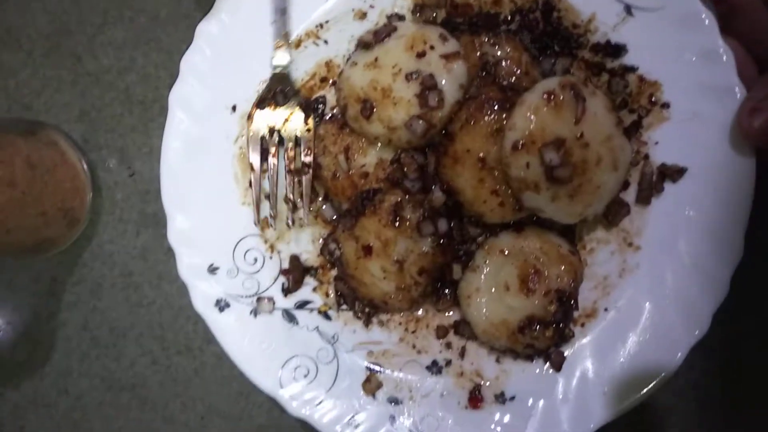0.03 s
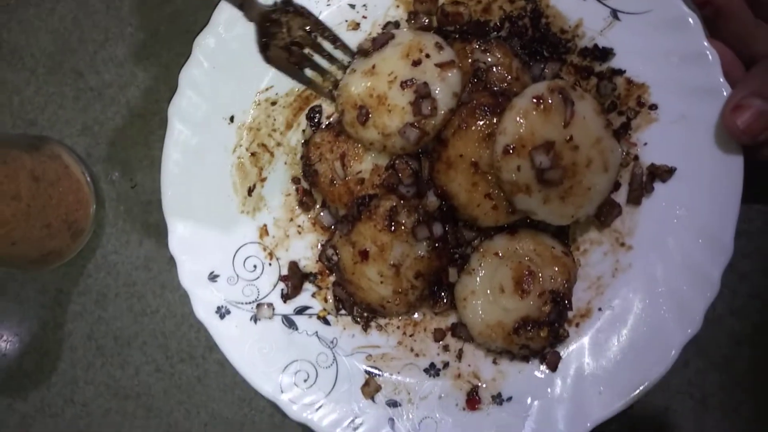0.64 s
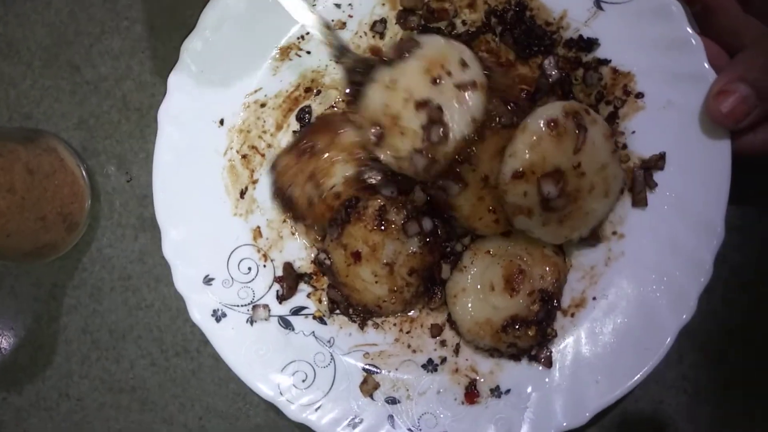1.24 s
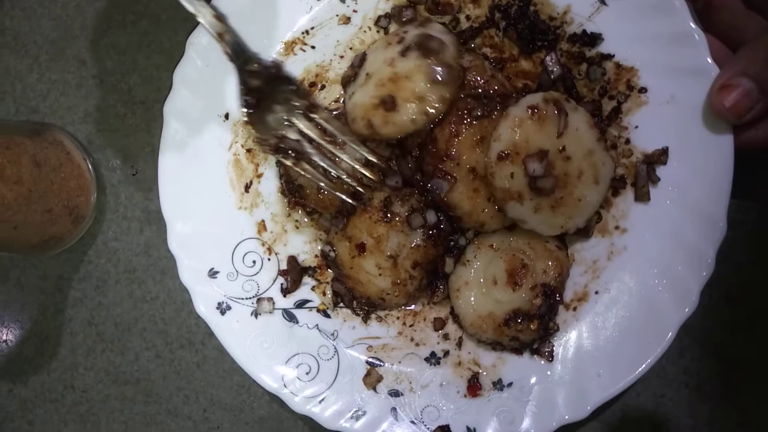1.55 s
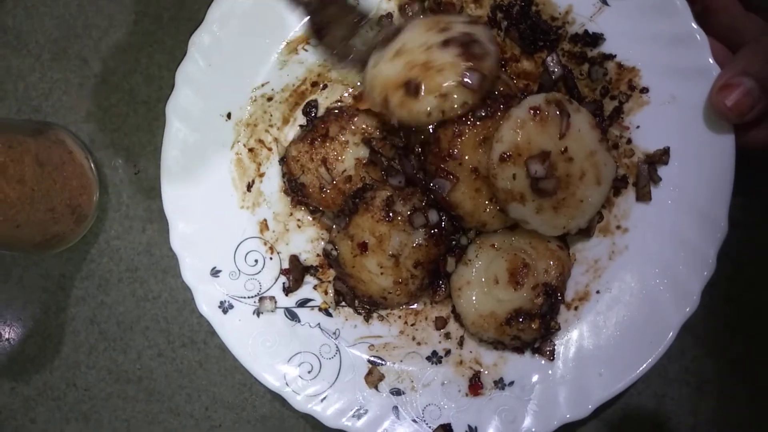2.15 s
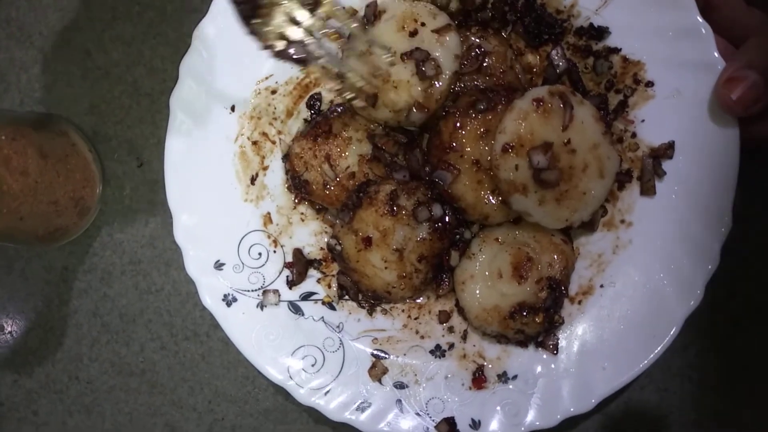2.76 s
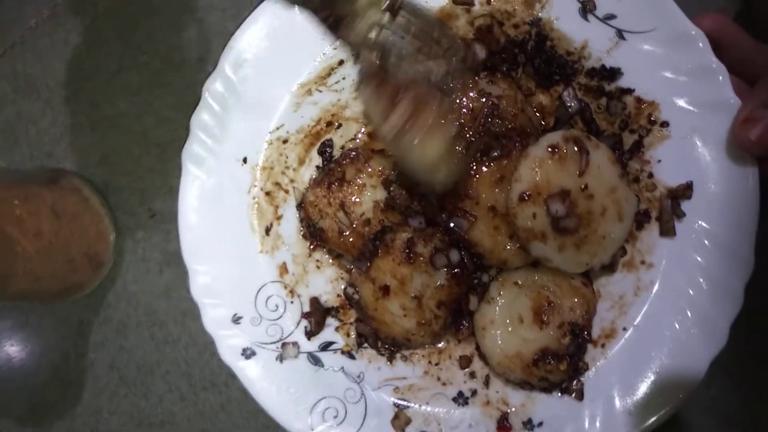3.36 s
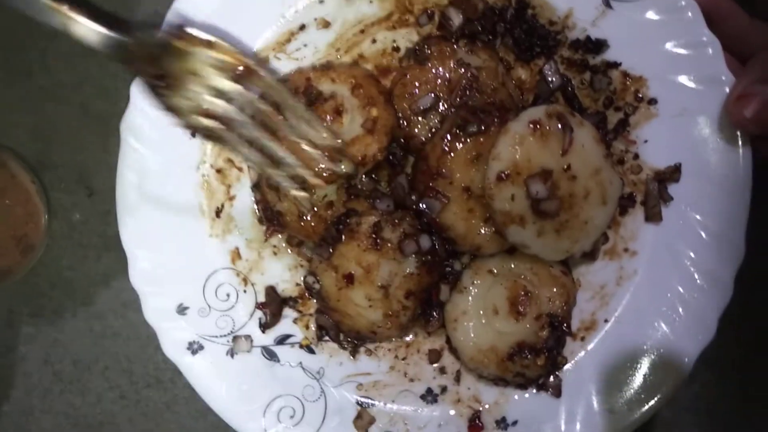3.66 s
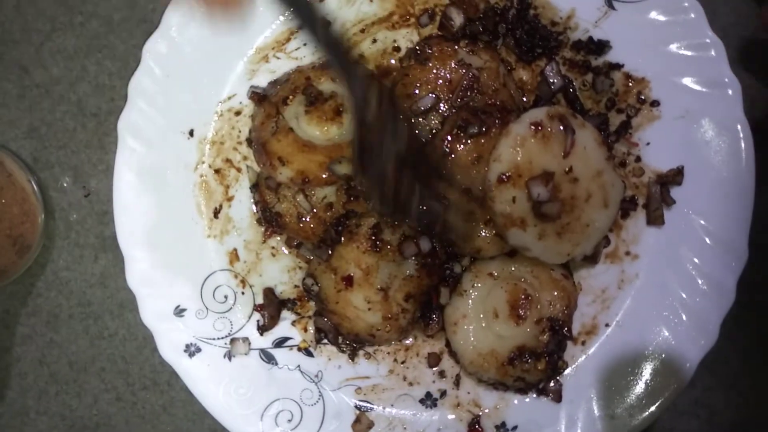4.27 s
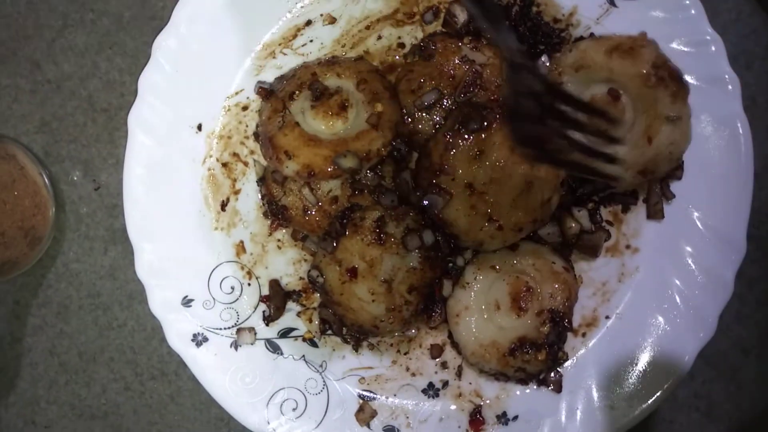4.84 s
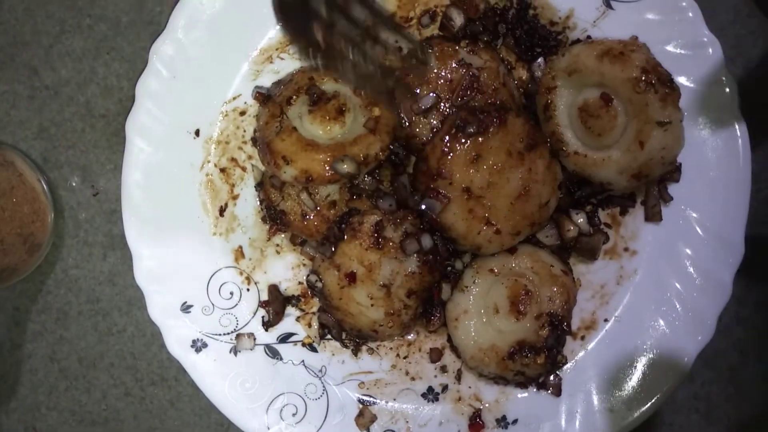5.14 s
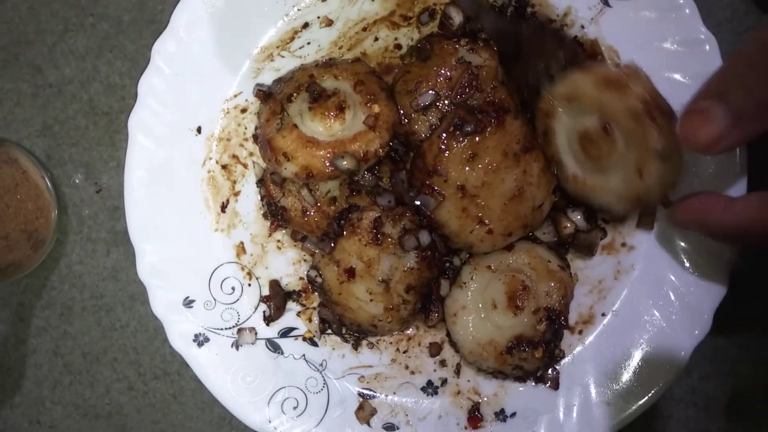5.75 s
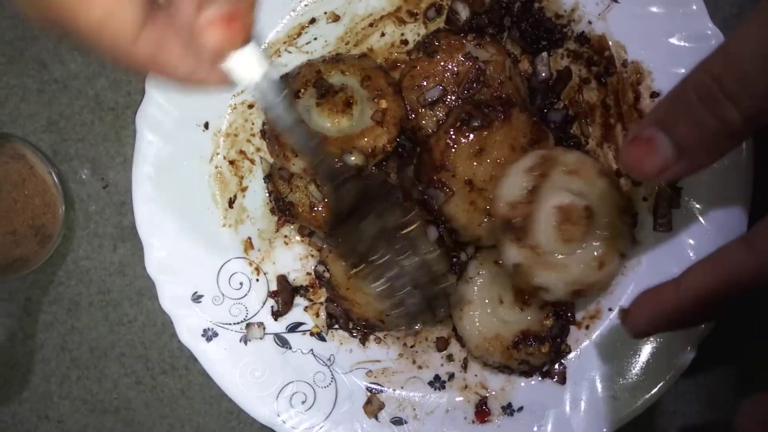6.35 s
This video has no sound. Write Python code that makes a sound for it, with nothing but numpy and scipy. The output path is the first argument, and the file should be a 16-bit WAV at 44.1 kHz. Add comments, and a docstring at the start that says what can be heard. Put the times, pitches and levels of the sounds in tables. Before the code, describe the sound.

A steel fork turns sauced dumplings on a plate, heard close in a small kitchen with a slight echo. A low appliance hum runs throughout, and a very faint high whirr comes and goes. The prongs scrape briefly at the start, then clink sharply at 0.4 seconds. From 0.7 to 1.4 seconds sticky sauce ticks and crackles faintly, and a dumpling drops with a soft wet thud at 1.3 seconds. Another sharp clink comes at 1.9 seconds, followed by a short squeak, lighter taps and a few faint smacks. A third bright clink lands at 2.9 seconds. Around 4 seconds a dull rush swells, like a vehicle far outside, holding until just past 5 seconds before sinking to a rumble. At 5.5 seconds the fork taps the rim and chatters lightly along it. One small wet smack of sauce comes at about 6.3 seconds.

```python
"""A steel fork turns sauced dumplings on a plate, close by, in a small humming kitchen where a faint
high whirr comes and goes. First the fork scrapes and clinks. Sticky sauce ticks and crackles as food
is lifted, and a dumpling drops back. Near 2 s the fork clinks and squeaks, and near 3 s it clinks again.
A dull rush swells, like a vehicle far outside. As it fades, the fork taps the rim and chatters along it.
One last smack of sauce ends the scene."""
import sys
import numpy as np
from scipy import signal
from scipy.fft import rfft, irfft, next_fast_len
from scipy.io import wavfile
from scipy.ndimage import map_coordinates

SR = 44100
rng = np.random.default_rng(int(sys.argv[2]) if len(sys.argv) > 2 else 0)


def master_out(mix):
    """Clip the mix to full scale and print it as 16-bit PCM to the path in sys.argv[1]."""
    frames = np.transpose(np.atleast_2d(mix))
    ceiling = np.clip(frames, -1, 1)
    pcm = np.round(ceiling * 32767).astype(np.int16)
    wavfile.write(sys.argv[1], SR, pcm)


N = 282681


def amp(db):
    """Turn decibels into a gain."""
    return 10 ** (np.asarray(db) / 20)


def unit(x):
    """Scale x to an average (rms) level of 1."""
    return x / np.sqrt(np.mean(x ** 2) + 1e-20)


def struck(x):
    """Scale a hit so that its first 10 ms have an average level of 1."""
    return x / np.sqrt(np.mean(x[:SR // 100] ** 2) + 1e-20)


def along(points, hz):
    """Read between (pitch_hz, value) points, with octaves evenly spaced."""
    pitches, values = np.transpose(points)
    return np.interp(np.log(hz + 1), np.log(pitches), values)


def wobble(rate):
    """A smooth random curve through rate values a second."""
    return map_coordinates(rng.standard_normal(int(N * rate / SR) + 4), [np.arange(N) * rate / SR])


def filtered(x, response):
    """Turn each frequency of x up or down by response(hz)."""
    size = next_fast_len(len(x) + 8192)
    return irfft(rfft(x, size) * response(np.fft.rfftfreq(size, 1 / SR)), size)[:len(x)]


def coloured(x, spectrum):
    """Give x a tone colour of (pitch_hz, level_db) points, at an average level of 1."""
    return unit(filtered(x, lambda hz: amp(along(spectrum, hz))))


def band(x, low_hz, high_hz):
    """Keep the part of x between two pitches."""
    return signal.sosfilt(signal.butter(4, (low_hz, high_hz), "bandpass", fs=SR, output="sos"), x)


def strokes(rows, attack_s, fade_s):
    """A gain that rises, holds and fades for each row. A fade_s is always the time to drop 60 dB."""
    t = np.arange(N) / SR
    return sum(amp(db - 60 * np.maximum(t - start - length, 0) / fade_s)
               * np.clip((t - start) / attack_s, 0, 1) for start, length, db in rows)


def add(track, start_s, sound):
    """Mix a sound into the track at start_s."""
    start = max(round(start_s * SR), 0)
    track[start:start + len(sound)] += sound[:N - start]


# how long the kitchen echoes: pitch_hz, fade_s
ECHO_FADES = [(200, .36), (1500, 0.5), (5000, 0.29), (9000, 0.25), (15000, .22)]
def in_kitchen(x, wet_db):
    """Add the echo of hard walls; its treble dies first."""
    hz, t, noise = signal.stft(rng.standard_normal(SR // 2), SR, nperseg=256)
    tail = signal.istft(noise * amp(-60 * t / along(ECHO_FADES, hz)[:, None]), SR, nperseg=256)[1]
    tail *= 1 - np.exp(-np.arange(len(tail)) / SR / .005)  # the first echoes take a moment
    return x + amp(wet_db) * signal.fftconvolve(x, tail / np.linalg.norm(tail))[:len(x)]


# tone colour of the room's air: pitch_hz, level_db
AIR_COLOUR = [(20, -18.5), (48, -25), (60, -13.5), (75, 0), (130, -3), (250, 2.5), (410, -9), (700, -6.5),
              (900, -13.5), (1700, -17.5), (2400, -22.5), (7000, -33), (8700, -43), (15500, -47.5)]
# the notes an appliance hums: pitch_hz, level_db
HUM_NOTES = [(103, -68), (126, -60), (172, -59.5), (349, -69)]
def room():
    """Steady air noise, a wavering appliance hum and a thin whirr in regular spells."""
    t = np.arange(N) / SR
    air = amp(-53 + .37 * wobble(5)) * coloured(rng.standard_normal(N), AIR_COLOUR)
    hum = sum(amp(db + 2 * wobble(6)) * np.sqrt(2) * np.sin(2 * np.pi * hz * t + .55 * wobble(9))
              for hz, db in HUM_NOTES)
    spell_start_s, every_s, lasts_s = .835, 1.157, .46
    progress = np.minimum((t - spell_start_s) % every_s / lasts_s, 1)
    spells = 2 * np.sqrt(progress * (1 - progress))
    whirr = coloured(rng.standard_normal(N), [(6000, -60), (7200, -9), (7530, 0), (7850, -9), (9000, -60)])
    return air + hum + amp(-77.5) * spells * whirr


# tone colour of the far rush: pitch_hz, level_db
RUSH_COLOUR = [(60, -22), (120, -1.5), (240, 4.5), (420, -1), (680, 2.5), (860, -11.5), (1100, -13.5),
               (1500, -24.5), (2500, -32.5), (6000, -61.5)]
def far_vehicle():
    """A rush dulled by the walls swells, holds and sinks to a lingering rumble."""
    t = np.arange(N) / SR
    near_s, leaves_s, near_db, linger_db = 4.5, 5.21, -47, -54.5
    rise_db_per_s, fall_db_per_s = 17.5, 13.5
    coming_db = near_db - rise_db_per_s * np.maximum(near_s - t, 0)
    going_db = np.maximum(near_db - fall_db_per_s * (t - leaves_s), linger_db)
    gain = amp(np.minimum(coming_db, going_db) + .8 * wobble(8))
    return gain * coloured(rng.standard_normal(N), RUSH_COLOUR)


def bubbles(rate, centre_hz, octaves, cycles, spread_db):
    """Tiny films burst, rate a second; each rings for a few cycles at its own pitch."""
    when, pitch, size = rng.random((int(rate * N / SR), 3)).T[:, :, None]
    hz = np.minimum(centre_hz * 2 ** (octaves * (pitch - .5)), SR / 2)
    samples = np.arange(256)
    age = hz * samples / SR  # in cycles
    pops = amp(-spread_db * np.log(.04 + size)) * np.sin(2 * np.pi * age) * np.exp(-age / cycles)
    positions = (when * N).astype(int) + samples
    return unit(np.bincount(positions.ravel(), pops.ravel(), N)[:N])


def pop(colour, fade_s):
    """A short puff of noise that dies away."""
    t = np.arange(SR // 4) / SR
    return struck(coloured(rng.standard_normal(len(t)), colour) * amp(-60 * t / fade_s))


# tone colours of a fat smack, a tick and a thin snap: pitch_hz, level_db
SMACK_COLOUR = [(100, -39.5), (350, -4.5), (700, 0.5), (1100, -9), (1750, 2.5), (2500, -4.5), (3500, -15),
                (8000, -39.5)]
TICK_COLOUR = [(1500, -28), (3000, 3), (3700, 2), (5000, -4.5), (6500, -0.5), (8500, -17.5), (16000, -38)]
SNAP_COLOUR = [(1000, -28), (4000, -8), (8000, -6), (10000, 0), (12000, -5), (15000, -1.5), (16000, -13)]
def smack(fineness):
    """A string of sauce breaks; the finer it is, the higher and shorter it sounds."""
    focus_db = 23.5  # how much a fat smack holds back the thin snap, and the reverse
    kinds = [pop(SMACK_COLOUR, .035), pop(TICK_COLOUR, .013), pop(SNAP_COLOUR, .012)]
    return sum(amp(-focus_db * (fineness - k / 2) ** 2) * kind for k, kind in enumerate(kinds))


# sauce strings breaking: start_s, level_db, fineness (0 fat smack, 0.5 tick, 1 thin snap)
SAUCE_STRINGS = [(.263, -73.5, .55), (.702, -70, .6), (.812, -68, .5), (.8248, -69, .9),
                 (.8872, -64.5, 0.79), (.937, -62.5, 0.21), (1.168, -58.5, 0), (1.185, -69, 0.84),
                 (1.275, -63, .3), (1.383, -61.5, 0.41), (2.3134, -69.5, .9), (2.344, -63, 0),
                 (2.664, -65, 0), (3.078, -69, .65), (3.4946, -71.5, .5), (3.865, -71, .5),
                 (4.5095, -66.5, 0.57), (6.342, -59.5, 0.042)]
# air pockets popping: start_s, pitch_hz, level_db
AIR_POCKETS = [(.811, 3600, -64), (.886, 3700, -68), (.944, 3000, -65), (.981, 2850, -67)]
# a dumpling landing on the plate: start_s, thud_db, splat_db
DUMPLING_DROPS = [(1.3225, -41.5, -41.5)]
# tone colour of its thud: pitch_hz, level_db
THUD_COLOUR = [(80, -20), (220, -6), (400, 6), (650, 5), (900, -4), (1300, -25), (3000, -37)]
# food peeling off the sticky plate: start_s, length_s, level_db
FOOD_PEELS = [(.66, 0.23, -78), (1.15, .2, -85), (2.05, 0.1003, -81), (5.5, .16, -77)]
# food sliding through the sauce: start_s, length_s, level_db
FOOD_SLIDES = [(.76, .52, -70.5), (5.08, .08, -70.5), (6.33, 0.025, -56)]
def sauce():
    """Sticky food smacks, pops, thuds, crackles and squishes as it is turned."""
    out, t = np.zeros(N), np.arange(SR // 4) / SR
    for start_s, db, fineness in SAUCE_STRINGS:
        add(out, start_s, amp(db) * smack(fineness))
    for start_s, hz, db in AIR_POCKETS:
        ping = np.sin(2 * np.pi * hz * t) * amp(-60 * t / .03) * (1 - np.exp(-t / .002))
        add(out, start_s, amp(db) * struck(ping))
    for start_s, thud_db, splat_db in DUMPLING_DROPS:
        thud = amp(thud_db) * pop(THUD_COLOUR, fade_s=.046)
        add(out, start_s, thud + amp(splat_db) * smack(fineness=.11))
    crackle = bubbles(rate=1200, centre_hz=11990, octaves=.74, cycles=6, spread_db=2.5)
    squish = bubbles(rate=700, centre_hz=2440, octaves=1.3, cycles=3, spread_db=4)
    out += strokes(FOOD_PEELS, attack_s=.042, fade_s=.6) * crackle
    out += strokes(FOOD_SLIDES, attack_s=.024, fade_s=.23) * squish
    return in_kitchen(out, wet_db=-13.5)


def grains(rate, spread_db):
    """Random clicks, rate a second, a few much larger than the rest."""
    clicks = (rng.random(N) < rate / SR) * rng.choice([-1, 1], N)
    return clicks * amp(spread_db * np.minimum(rng.exponential(size=N), np.pi))


# the prongs dragging over the glaze: start_s, length_s, level_db
PRONG_DRAGS = [(0, 0.022, -52.5), (.025, .011, -41), (.043, .01, -39.5), (.105, .004, -60)]
# notes that ring under the drag, damped by the pressing prongs: pitch_hz, width_hz, level_db
SQUEAL_NOTES = [(1925, 130, -3), (2500, 110, -6), (3210, 110, 0), (4880, 110, -4), (5500, 110, -9),
                (5990, 120, -2), (7070, 70, -2), (8320, 90, -17), (9850, 100, -10), (11250, 120, -17),
                (14600, 250, -19)]
def scrape():
    """The prongs stick and slip on the glaze, which rasps and squeals."""
    def ringing(f):
        return sum((-1) ** k * amp(db) * 1j * f * width / (hz * hz - f * f + 1j * f * width)
                   for k, (hz, width, db) in enumerate(SQUEAL_NOTES))

    slips = strokes(PRONG_DRAGS, attack_s=.002, fade_s=.018) * unit(grains(rate=2500, spread_db=3))
    squeal = unit(filtered(slips, ringing))
    rasp = coloured(slips, [(600, -14.5), (1800, 4.5), (6500, -1), (8500, -18), (15000, -14.5)])
    return in_kitchen(np.std(slips) * (amp(-3) * squeal + amp(-5.5) * rasp), wet_db=-13)


def squeak():
    """A prong skids over the glaze with a brief falling tone; a second prong squeaks higher."""
    start_s, length_s, level_db, first_hz, fall_hz_per_s = 1.958, .01, -37, 2460, 11000
    hz = np.clip(first_hz - fall_hz_per_s * (np.arange(N) / SR - start_s), first_hz / 2, first_hz)
    phase = 2 * np.pi * np.cumsum(hz) / SR + .6 * wobble(300)
    gain = strokes([(start_s, length_s, level_db)], attack_s=.0045, fade_s=.068)
    second_prong = amp(-9) * np.sin(1.4 * phase)
    return in_kitchen(gain * (np.sin(phase) + second_prong), wet_db=-18)


# tone colour of the crack when steel hits the plate: pitch_hz, level_db
CRACK_COLOUR = [(300, -7.5), (700, -3), (1050, -3.5), (1300, -12.5), (1700, 2.5), (2300, -3.5),
                (3000, -8.5), (4200, -4), (8000, -1.5), (10300, -4), (11500, -12), (16000, -12.5)]
def clink(t, notes, crack_db, crack_fade_s, scatter_db, detune):
    """One hit: a crack and ringing notes, a little different with each grip and angle."""
    hz, db, fade_s = np.transpose(notes)[:, :, None]
    strength, pitch, phase = rng.standard_normal((3, len(hz), 1))
    tones = np.sin(2 * np.pi * hz * (1 + detune * pitch) * t + np.pi * phase)
    ring = amp(db + scatter_db * strength - 60 * t / fade_s) * tones
    crack = amp(crack_db - 60 * t / crack_fade_s) * coloured(rng.standard_normal(len(t)), CRACK_COLOUR)
    return (ring.sum(0) + crack) * (1 - np.exp(-t / .00035))


# the side of the fork taps the rim, then chatters along it: start_s, level_db
RIM_HITS = [(5.458, -36.5), (5.49, -63), (5.541, -62), (5.555, -56), (5.5621, -46.5), (5.582, -53),
            (5.602, -52), (5.6118, -46), (5.632, -56)]
# the notes a rim tap rings with: pitch_hz, level_db, fade_s
RIM_NOTES = [(2475, -20.5, 0.16), (3130, -15.5, 0.26), (3650, -9.5, 0.034), (3890, -15.5, 0.2),
             (4420, -4.5, .035), (4510, 5.5, 0.039), (4740, -17, 0.027), (5500, -10, 0.044),
             (7150, -24, 0.13), (9170, -14, 0.031), (9300, -16, 0.032), (11350, -14, .04),
             (11700, -17, .06), (13000, -20, .04), (14400, -17, .05), (14200, -17, .06)]
def rim_chatter():
    """A free tap lets the rim ring; on weaker bounces the fork stays in touch and muffles it."""
    out, t = np.zeros(N), np.arange(SR // 2) / SR
    full_touch_db, pitch_rise = 15, .014  # a tap this much weaker stays in touch and rings higher
    first_treble_db, dull_db_per_s = -51.5, 75  # the treble dulls as the fork settles
    first_s, first_db = RIM_HITS[0]
    for start_s, db in RIM_HITS:
        touch = np.clip((first_db - db) / full_touch_db, 0, 1)
        treble_db = first_treble_db + .45 * (db - first_db) - dull_db_per_s * (start_s - first_s)
        tap = clink(t * (1 + pitch_rise * touch), RIM_NOTES,
                    crack_db=-8.5, crack_fade_s=.021, scatter_db=1.5, detune=.0008)
        tap *= amp(-60 * touch * t / .046) * (1 - touch * np.exp(-t / .004))  # shorter and softer
        ring = amp(db) * struck(band(tap, 2000, 8000))
        treble = amp(treble_db) * struck(band(tap, 8000, 15800))
        add(out, start_s, in_kitchen(ring + treble, wet_db=-10.5))
    return out


# the notes fork and plate ring with together: pitch_hz, level_db, fade_s
FORK_NOTES = [(712, -14.5, .05), (1027, -17.5, .07), (1128, -19.5, 0.081), (1377, -26.5, .06),
              (1630, -16, 0.063), (1850, -13, 0.033), (2307, -17.5, .03), (2454, -16.5, 0.12),
              (3170, -27.5, 0.16), (3990, -12.5, 0.1), (4260, -2, .035), (4330, 2, 0.046), (4510, 1, .05),
              (4820, -7.5, 0.054), (5127, -11, 0.032), (5320, -3, 0.033), (5380, -11.5, .08),
              (5580, -8.5, 0.099), (5700, -12, 0.044), (5970, -18.5, .05), (6470, -17, .03),
              (7100, -11, .08), (7400, -5, 0.055), (7470, -5, .05), (8000, -13.5, 0.041),
              (8250, -21.5, .07), (10100, -20.5, .03), (9836, -14, .045), (9950, -16.5, .04),
              (9700, -18.5, 0.078), (11250, -28, 0.045), (14400, -16.5, .03), (14300, -10, .04),
              (15030, -18.5, 0.034)]
# borders that sort those notes into seven bands, low to high: edge_hz
BAND_EDGES = [450, 1450, 2050, 3500, 4750, 6500, 8600, 15800]
# each band's share of an ordinary hit: level_db
BAND_LEVELS = [-16, -13.5, -16, -0.5, -6, -6, -12]
# the fork hitting the plate: start_s, level_db, hardness_db_per_octave, knock_db, main_db, upper_db
FORK_HITS = [(.372, -19.5, 2.1, 2.5, -0.5, -4.5), (0.566, -58.5, 0, 0, 2.5, -6),
             (1.8894, -19.5, -.5, -3, 3, -.5), (1.9998, -42.5, 0, -2, -0.5, 2.5),
             (2.0432, -55.5, 4.5, 0, 4, -4), (2.168, -35.5, -3.5, -4, -4.5, 1.5),
             (2.912, -21.5, -0.45, 4.5, 1.5, 8.5)]
def fork_clinks():
    """A harder hit is brighter; the spot struck favours the plate's knock, the main or upper ring."""
    out, t = np.zeros(N), np.arange(SR // 2) / SR
    octaves = (np.log2(BAND_EDGES[:-1]) + np.log2(BAND_EDGES[1:])) / 2
    knock, main, upper = np.eye(len(octaves))[[0, 3, 4]]  # pick the bands near 1, 4.3 and 5.4 kHz
    for start_s, db, hardness, knock_db, main_db, upper_db in FORK_HITS:
        spot_db = knock_db * knock + main_db * main + upper_db * upper
        levels_db = db + np.array(BAND_LEVELS) + hardness * (octaves - octaves @ main) + spot_db
        hit = clink(t, FORK_NOTES, crack_db=-1, crack_fade_s=.025, scatter_db=1.2, detune=.0015)
        shaped = sum(gain * struck(band(hit, low, high))
                     for gain, low, high in zip(amp(levels_db), BAND_EDGES, BAND_EDGES[1:]))
        add(out, start_s, in_kitchen(shaped, wet_db=-13))
    return out


def scene():
    """Everything heard from one spot above the plate."""
    return (fork_clinks() + rim_chatter() + squeak() + scrape() + sauce() + room() + far_vehicle())[None]


def record(dry):
    """Cut away the very highest treble."""
    top_hz = 15700
    return np.array([filtered(x, lambda hz: 1 / np.sqrt(1 + (hz / top_hz) ** 200)) for x in dry])


dry = scene()
out = record(dry)
master_out(out)
```